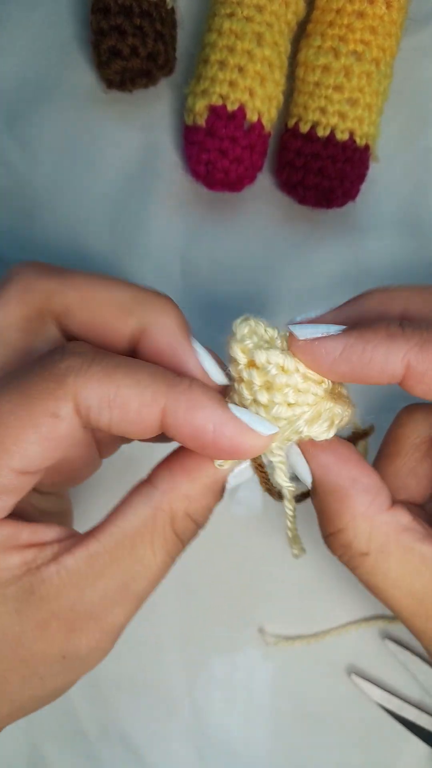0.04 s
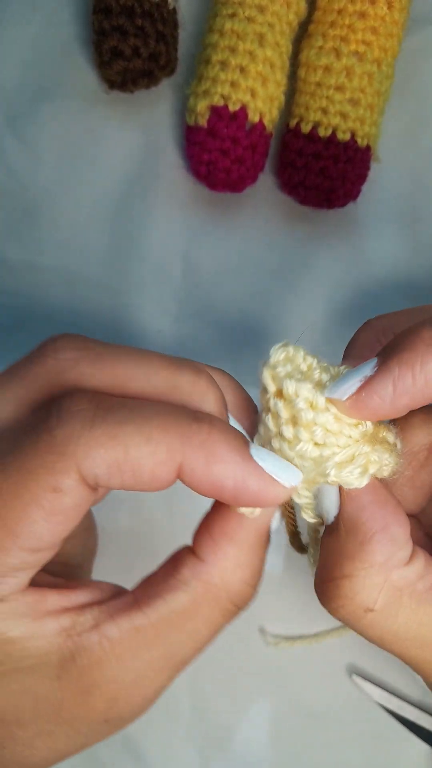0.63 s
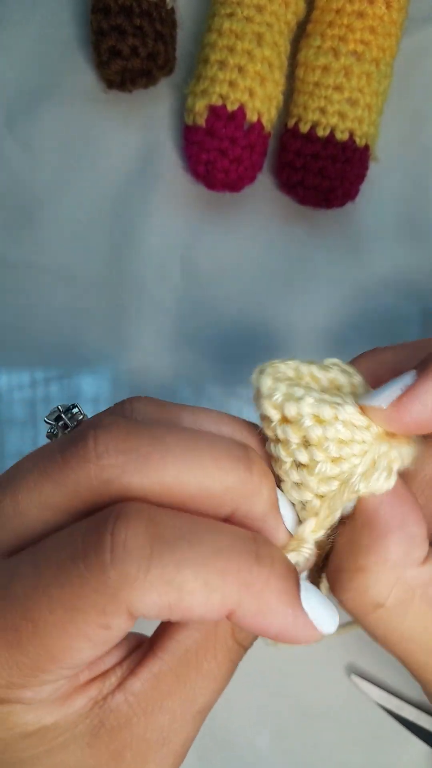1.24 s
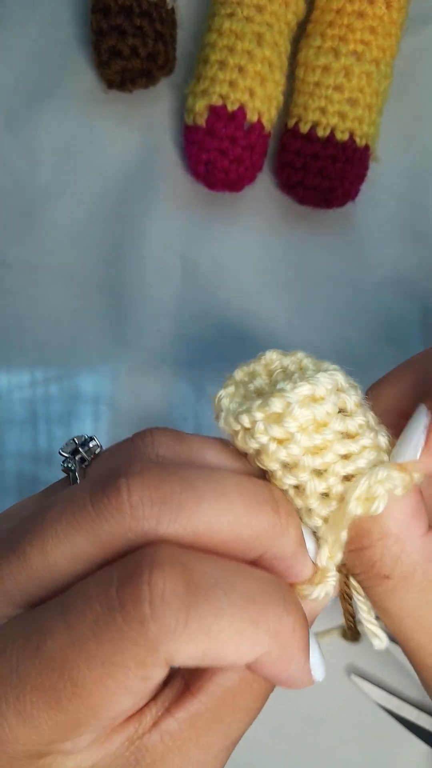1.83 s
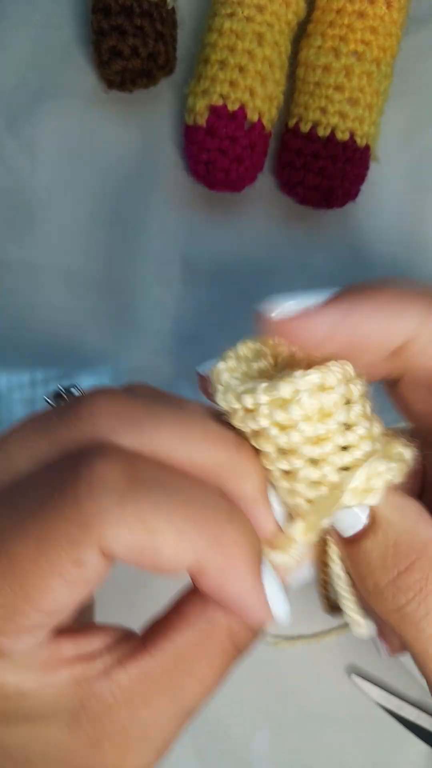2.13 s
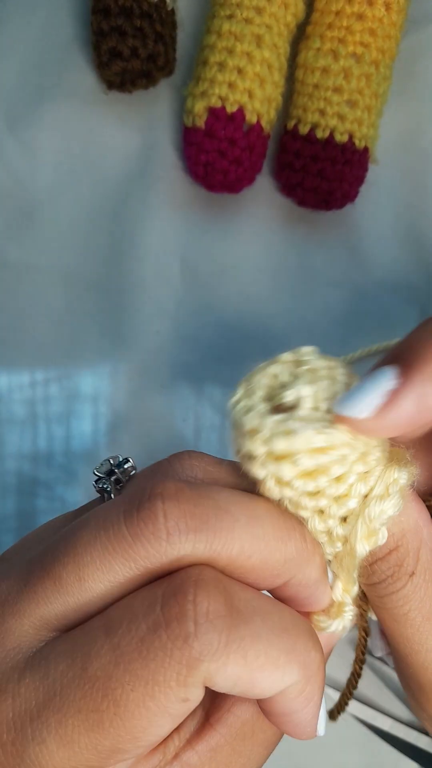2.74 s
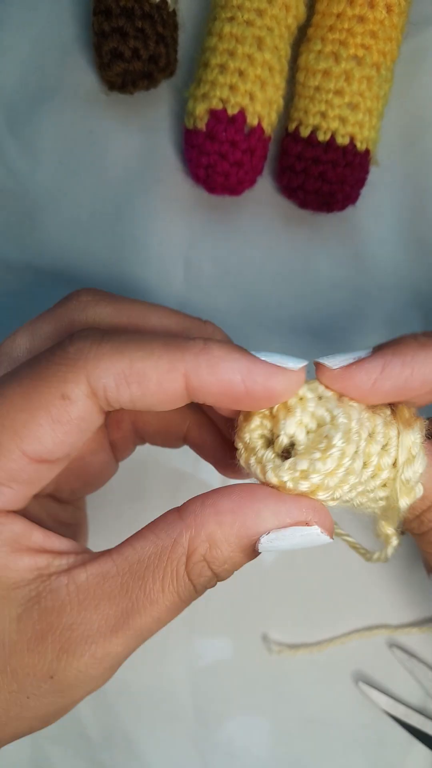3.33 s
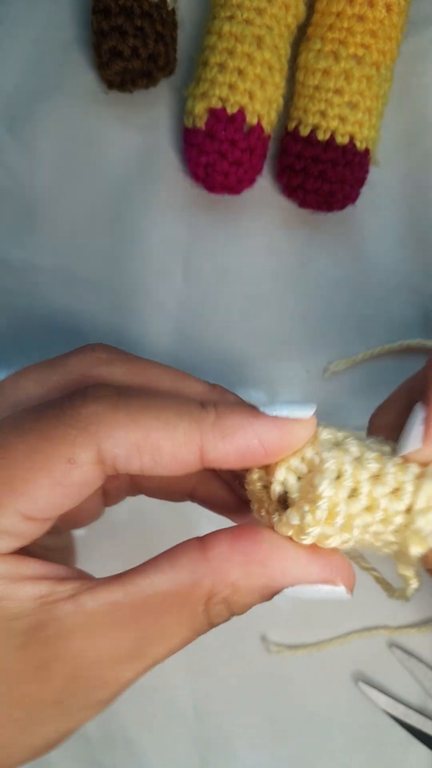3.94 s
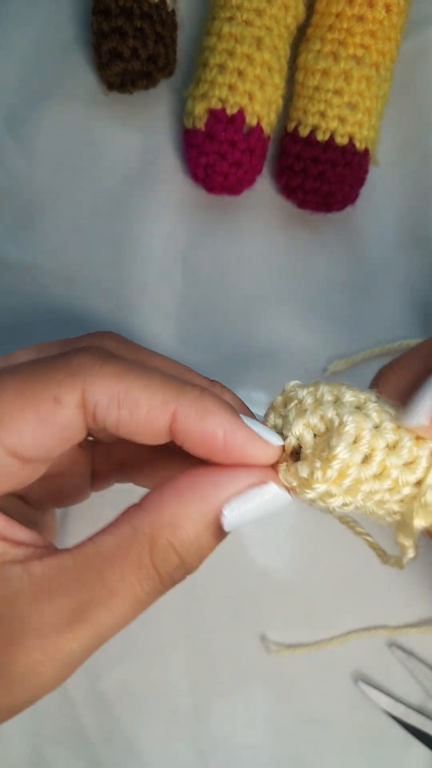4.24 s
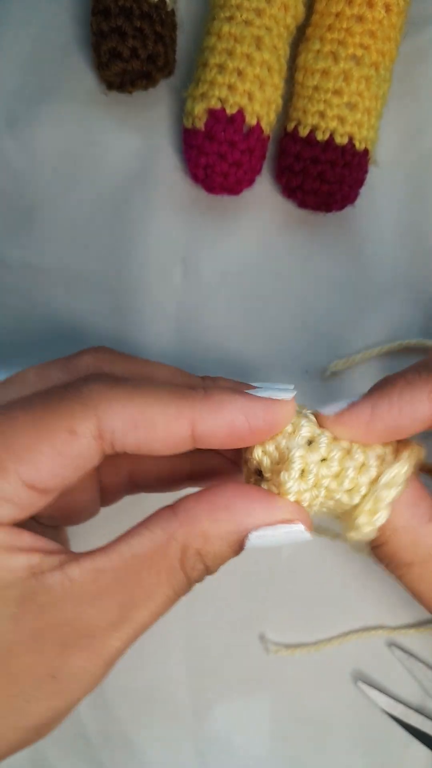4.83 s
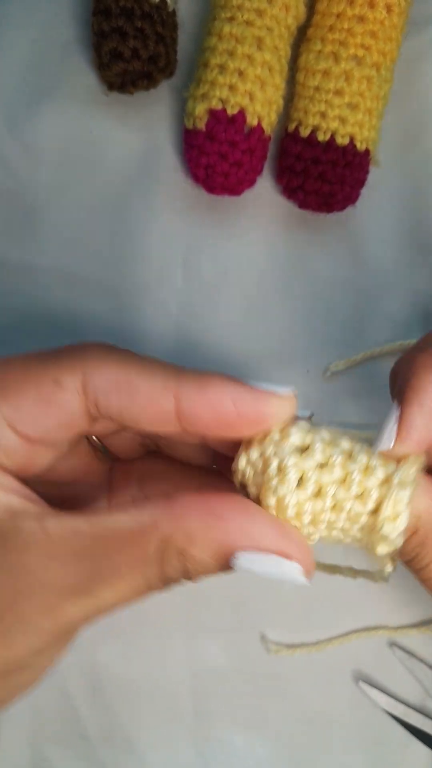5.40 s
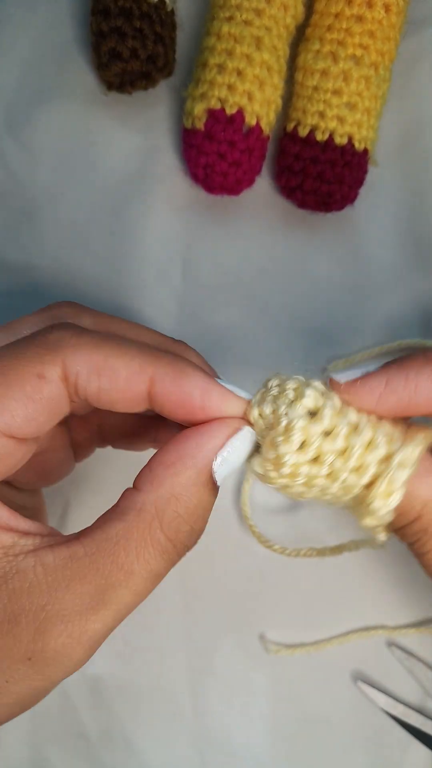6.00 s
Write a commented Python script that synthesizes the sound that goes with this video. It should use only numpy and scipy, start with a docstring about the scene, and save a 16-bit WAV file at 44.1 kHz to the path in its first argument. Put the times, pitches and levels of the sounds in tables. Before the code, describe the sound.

A low hum pulses steadily indoors, with a deep rumble and a little hiss beneath it. Near the microphone, slightly to the left, fingers rub and turn crocheted yarn in short, quiet strokes. Long nails tick and scuff on the stitches, the hands bump with dull thuds, and a few tiny squeaks slip out, mostly in the second half. A dog gives a few faint, hoarse barks in the distance.

```python
"""Yarn rustles close by as long-nailed fingers knead and turn a small crocheted piece in a small room. Behind
it, two motors hum a little out of step and beat slowly against each other, over a low rumble and a faint hiss.
Nails tick as they snap off stitches, the hands bump softly, and a dog barks a few times far away. Shifting skin
rasps, dragged nails scuff, and a few faint squeaks come and go."""
import sys
import numpy as np
from scipy import signal
from scipy.fft import rfft, irfft, next_fast_len
from scipy.io import wavfile

SR = 44100
rng = np.random.default_rng(int(sys.argv[2]) if len(sys.argv) > 2 else 0)


def int16_out(signal):
    """Quantize to a 16-bit WAV file."""
    q = np.round(np.clip(np.atleast_2d(signal).T, -1, 1) * 32767)
    wavfile.write(sys.argv[1], SR, q.astype(np.int16))


N = 271684
TIME = np.arange(N) / SR

# fingers sliding over the yarn: (peak time [s], length [s], relative level [dB])
YARN_STROKES = [(0.015, 0.12, -72.5), (.335, 0.027, -78), (0.466, .07, -77), (0.831, 0.032, -72),
                (1.2, 0.033, -71), (1.256, 0.042, -66), (2.109, .095, -65.5), (2.515, 0.13, -66),
                (2.663, .04, -71.5), (2.783, 0.033, -66), (3, 0.099, -66), (3.773, 0.038, -73.5),
                (3.891, 0.066, -67), (4.365, .13, -72), (4.953, 0.058, -72), (5.185, .1, -78),
                (5.495, 0.1, -79.5), (5.818, 0.072, -75)]
# light brushing between strokes: (time [s], relative level [dB])
LIGHT_BRUSHING = [(0, -92), (.55, -86.5), (.72, -72), (.88, -81.5), (1.1, -75.5), (1.7, -84), (2.3, -89),
                  (3.2, -75), (3.65, -85), (4.05, -77.5), (4.7, -85.5), (6.16, -87.5)]
# tone of slipping fibres: (frequency [Hz], relative level [dB])
YARN_SPECTRUM = [(1500, 2), (4000, -5), (5600, -4), (8300, 0.5), (10500, -5.5), (13000, -8.5), (16000, -8)]
# the room's low rumble: (frequency [Hz], relative level [dB])
RUMBLE_SPECTRUM = [(27, -29.5), (34, -23.5), (39, 2.5), (50, 0), (64, 2), (100, -3), (150, -6.5),
                   (200, -14), (300, -19.5), (450, -29), (650, -37.5), (1200, -45), (2500, -56)]
# how the rumble leans to one side: (frequency [Hz], relative lean to the left [dB])
RUMBLE_LEAN = [(40, -0.5), (130, 3), (270, -2.5), (600, 1)]
# the room's faint hiss: (frequency [Hz], relative level [dB])
HISS_SPECTRUM = [(500, -3), (1500, -0.5), (3000, -1.5), (4800, -4.5), (6200, -3), (8300, 5), (10500, 1),
                 (15500, 0.5)]
# how alike the room's noise is left and right: (frequency [Hz], likeness [0 to 1])
STEREO_LIKENESS = [(40, 0.98), (150, 0.94), (300, 0.58), (600, 0.11), (1500, 0), (12000, 0.037)]
# single nail ticks: (time [s], relative level [dB], rough pitch [Hz])
NAIL_TICKS = [(0.4511, -53.5, 5800), (0.706, -61, 6900), (0.7781, -56, 2250), (1.2567, -61, 2300),
              (1.7927, -60.5, 11000), (1.8047, -60, 4000), (1.833, -50, 7000), (1.9259, -62, 2600),
              (1.9652, -62.5, 2500), (2.1607, -66.5, 4200), (2.5166, -54, 11500), (2.685, -60.5, 9500),
              (2.8363, -72, 1300), (3.8114, -64.5, 6450), (3.8636, -55, 6900), (4.376, -62.5, 5200),
              (4.7276, -68.5, 9500), (6.0463, -67.5, 5000)]
# the knock, snap and sparkle of a tick: (low edge [Hz], high edge [Hz])
NAIL_BANDS = [(820, 2960), (2300, 4200), (5300, 13600)]
# hands bumping together: (time [s], relative level [dB], pitch [Hz])
HAND_BUMPS = [(0.458, -45, 104), (1.531, -37.5, 107), (1.836, -39, 146), (2.469, -50, 192),
              (3.000, -36, 83.4), (3.367, -44, 69), (3.864, -48.5, 168), (5.16, -48, 162), (5.929, -36, 99)]
# far barks: (time [s], length [s], relative level [dB], brightness [dB])
DOG_BARKS = [(0.664, 0.044, -61.5, 2.5), (3.135, 0.062, -62, 1), (3.372, 0.045, -60.5, -18),
             (5.395, 0.048, -72.5, -25)]
# the tones in a bark: (multiple of the pitch [number], relative level [dB])
BARK_HARMONICS = [(1, -6), (2, 6.5), (3, -10.5), (4, -20)]
# where the dog's throat rings: (frequency [Hz], width [Hz], relative level [dB])
THROAT_RESONANCES = [(403, 210, 5.5), (703, 107, 4), (1397, 300, 2.5), (1590, 220, -6), (2000, 180, -34),
                     (2830, 1300, -19)]
# skin and hands shifting: (peak time [s], length [s], relative level [dB])
SKIN_SHIFTS = [(0.82, 0.054, -86), (1.991, 0.029, -71), (2.539, 0.083, -66.5), (3.07, 0.13, -78),
               (3.29, 0.3, -82), (4.423, 0.22, -83), (4.965, 0.069, -83.5)]
# dull tone of rubbing skin: (frequency [Hz], relative level [dB])
SKIN_SPECTRUM = [(250, 9), (500, 2.5), (1000, -1), (1600, -5.5), (2800, 2), (4200, -9), (6000, -6),
                 (10000, -41)]
# nails dragged over stitches: (time [s], length [s], relative level [dB])
NAIL_DRAGS = [(1.521, 0.024, -58.5), (1.539, 0.0096, -56), (1.547, 0.026, -64.5), (3.903, 0.01, -66),
              (3.924, 0.0087, -68), (4.486, 0.022, -65), (5.145, 0.035, -61)]
# bright tone of a dragged nail: (frequency [Hz], relative level [dB])
SCUFF_SPECTRUM = [(500, -4.5), (1200, -14.5), (2500, -1.5), (5000, -3.5), (8300, 6), (12000, -1.5),
                  (16000, 1.5)]
# thin squeaks: (time [s], length [s], pitch [Hz], width [Hz], relative level [dB])
THIN_SQUEAKS = [(2.232, 0.024, 3750, 500, -77), (4.443, .11, 3650, 220, -75),
                (4.508, 0.0856, 3570, 198, -78), (4.585, 0.015, 9020, 1790, -55.5),
                (4.59, .04, 8450, 910, -72), (5.707, .06, 2520, 300, -80.5)]

MOTOR_HZ, OTHER_MOTOR_HZ = 117.802, 119.947
IN_STEP_S = .14   # a moment when both hums push together


def from_db(db):
    """Turn decibels into a number to multiply a sound by."""
    return 10 ** (np.asarray(db) / 20)


def rms_one(x):
    """Scale a sound to an average strength (rms) of 1."""
    return x / np.sqrt(np.mean(x ** 2) + 1e-20)


def at_hz(points, hz):
    """Read between the rows of a table, with frequency spaced in octaves."""
    freqs, values = np.transpose(points)
    return np.interp(np.log(np.maximum(hz, 1)), np.log(freqs), values)


def pan(left_db):
    """Left and right gains that make the left side left_db louder."""
    return from_db(np.array([[left_db], [-left_db]]) / 2)


def add(out, s, sound):
    """Mix a short sound in at time s."""
    start = round(s * SR)
    out[..., start:start + sound.shape[-1]] += sound[..., :N - start]


def keep_band(x, kind, hz, order):
    """Keep the lows, the highs or a band; a higher order cuts more steeply."""
    return signal.sosfilt(signal.butter(order, hz, kind, fs=SR, output="sos"), x)


def colour(x, spectrum):
    """Shape the lows and highs of a steady sound; its rms ends up at 1."""
    size = next_fast_len(N)
    gain = from_db(at_hz(spectrum, np.fft.rfftfreq(size, 1 / SR)))
    return rms_one(irfft(rfft(x, size) * gain, size)[..., :N])


def friction(spectrum, per_s, spread_db, stereo_width):
    """Countless tiny slips of uneven size, each a bit different left and right."""
    slipping = rng.random(N) < per_s / SR
    sizes = from_db(spread_db * np.minimum(rng.exponential(1, N), 4))
    pushes = rng.standard_normal(N) + stereo_width * rng.standard_normal((2, N))
    return colour(slipping * sizes * pushes, spectrum)


def stroke(s, length_s, rise_share=.52, squareness=2.42):
    """Speed of a sliding finger: it builds up, peaks at time s and eases off."""
    width_s = length_s * np.where(TIME < s, rise_share, 1 - rise_share)
    return np.exp(-np.minimum(np.abs((TIME - s) / width_s) ** squareness / 2, 30))


def flutter(per_s, depth_db):
    """A gain that wanders at random, about per_s times a second."""
    steps = rng.standard_normal(4000)
    return from_db(depth_db * np.interp(TIME * per_s, np.arange(len(steps)), steps))


def yarn_rustle(edge_hz=5070, light_db=-78, db_per_octave=21.5):
    """Fingers sliding on yarn hiss; a firmer stroke reaches lower in pitch."""
    slips = friction(YARN_SPECTRUM, per_s=3500, spread_db=2.2, stereo_width=.8)
    slips *= flutter(per_s=63, depth_db=3)   # uneven from stitch to stitch
    brush = from_db(np.interp(TIME, *np.transpose(LIGHT_BRUSHING))) * flutter(per_s=12, depth_db=.5)
    out = brush * keep_band(slips, "high", edge_hz, order=4)
    for s, length_s, db in YARN_STROKES:
        span = slice(max(int((s - 2 * length_s) * SR), 0), int((s + 2 * length_s) * SR))
        low_hz = edge_hz * 2 ** ((light_db - db) / db_per_octave)
        hiss = keep_band(slips[:, span], "high", low_hz, order=4)
        out[:, span] += from_db(db) * stroke(s, length_s)[span] * hiss
    return out


def reverb(x, fade_s, top_hz):
    """Many echoes off the walls, different on each side, falling 60 dB in fade_s."""
    t = TIME[:SR // 2]
    tail = rng.standard_normal((2, len(t))) * from_db(-60 * t / fade_s) * (1 - np.exp(-t / .0011))
    tail = keep_band(tail, "low", top_hz, order=1)
    return signal.fftconvolve(x, tail / np.sqrt(np.sum(tail ** 2) / 2), axes=-1)[:, :N]


def hum(motor_db, other_motor_db, overtone_db):
    """One motor turns a little slower than the other, so together they throb about twice a second."""
    turn = 2 * np.pi * (TIME - IN_STEP_S)
    motor = from_db(motor_db) * np.cos(MOTOR_HZ * turn)
    other_motor = from_db(other_motor_db) * np.cos(OTHER_MOTOR_HZ * turn)
    return motor + other_motor + from_db(overtone_db) * np.cos(2 * OTHER_MOTOR_HZ * turn)


def noise_all_around(spectrum):
    """Noise from every side: left and right are alike in the bass, unrelated in the treble."""
    size = next_fast_len(N)
    alike = at_hz(STEREO_LIKENESS, np.fft.rfftfreq(size, 1 / SR))
    shared, opposite = rfft(rng.standard_normal((2, size)))
    both = np.sqrt(1 + alike) * shared + np.sqrt(1 - alike) * opposite * [[1], [-1]]
    return colour(irfft(both, size), spectrum)


def room_air(rumble_db, hiss_db, rumble_throb, hiss_throb):
    """Low rumble and faint hiss that swell and sink with the throb of the hum."""
    beat = np.log(1.25 + np.cos(2 * np.pi * (OTHER_MOTOR_HZ - MOTOR_HZ) * (TIME - IN_STEP_S)))
    rumble = noise_all_around(RUMBLE_SPECTRUM)
    for channel, side in enumerate((1, -1)):
        rumble[channel] = colour(rumble[channel], [(hz, side * db / 2) for hz, db in RUMBLE_LEAN])
    deep = signal.sosfiltfilt(signal.butter(2, 90, fs=SR, output="sos"), rumble)
    throb_db = rumble_throb * beat
    rumble = deep * from_db(throb_db / 2) + (rumble - deep) * from_db(throb_db)
    hiss = from_db(hiss_db + hiss_throb * beat) * noise_all_around(HISS_SPECTRUM)
    return from_db(rumble_db) * rumble * pan(1.6) + hiss * pan(1.3)


def slipping_strand(start_s=.9193, first_gap_s=.0145, slowing=1.73, first_db=-68.5, hz=8100):
    """A strand tightens as it slips under a nail: lists five ticks, ever slower and harder."""
    gaps = first_gap_s * slowing ** np.arange(4)
    times = start_s + np.append(0, np.cumsum(gaps))
    return [(s, first_db + k, hz) for k, s in enumerate(times)]


def tick_band_levels(db, hz, hard_db=-52.5):
    """A tick is strongest near its pitch, and spreads wider the harder it is."""
    centres_hz = np.sqrt(np.prod(NAIL_BANDS, axis=1))
    db_per_octave = 4 + .57 * (hard_db - db)
    return db - db_per_octave * np.abs(np.log2(centres_hz / hz))


def resonate(x, hz, width_hz):
    """Ring at one pitch; a smaller width rings longer."""
    r = np.exp(-np.pi * width_hz / SR)
    feedback = [1, -2 * r * np.cos(2 * np.pi * hz / SR), r * r]
    return signal.lfilter(np.array([1, 0, -1]) * (1 - r * r) / 2, feedback, x)


def nail_ticks(crackle=.26, decay_s=.0026, bounce_db=-12.5, bounce_s=.0021):
    """A nail snaps off a stitch or another nail: a click, its echo off the hand and a brief crackle."""
    out, t = np.zeros((2, N)), TIME[:SR // 60]
    for s, tick_db, hz in NAIL_TICKS + slipping_strand():
        click = crackle * rng.standard_normal((2, len(t))) * np.exp(-t / decay_s)
        click[:, 0] += 1
        click[:, round(bounce_s * rng.uniform(.6, 1.4) * SR)] += from_db(bounce_db)
        click += from_db(-4) * resonate(click, hz=996, width_hz=57)   # a long nail rings briefly
        for edges_hz, db in zip(NAIL_BANDS, tick_band_levels(tick_db, hz)):
            band = keep_band(click, "band", edges_hz, order=3)
            add(out, s, from_db(db) * band / band[:, :SR // 200].std())
    return out


def hand_bumps(rise_cycles=.45):
    """Flesh on flesh: a low thud that dies within a few vibrations."""
    out, t = np.zeros(N), TIME[:SR // 8]
    for s, db, hz in HAND_BUMPS:
        age = t * hz / rise_cycles
        add(out, s, -from_db(db) * age * np.exp(1 - age) * np.sin(2 * np.pi * hz * t))
    return out


def dog(pitch_hz, tone_db, rasp_db, echo_db):
    """Hoarse barks that ring most an octave above their pitch, blurred by walls on the way."""
    out, t = np.zeros((2, N)), TIME[:SR // 3]
    for s, length_s, db, bright_db in DOG_BARKS:
        # the rasp outlasts the tone
        tone_shape = (1 - np.exp(-t / .009)) * np.exp(-np.maximum(t - .7 * length_s, 0) / .02)
        rasp_shape = (1 - np.exp(-t / .0083)) * np.exp(-np.maximum(t - length_s / 2, 0) / .045)
        noise = rng.standard_normal((3, len(t)))
        breath, jitter = noise[:2], noise[2]
        phase = 2 * np.pi * np.cumsum(pitch_hz * (1 + .24 * jitter)) / SR
        tone = sum(from_db(level) * np.sin(k * phase) for k, level in BARK_HARMONICS)
        throat = sum(from_db(level) * resonate(breath, hz, width)
                     for hz, width, level in THROAT_RESONANCES)
        chest = keep_band(throat, "low", 700, order=1)
        rasp = chest + from_db(bright_db) * (throat - chest)   # a duller bark keeps its lows
        rasp = keep_band(rasp, "low", 3100, order=6) / throat.std()
        add(out, s, from_db(db + tone_db) * tone_shape * tone + from_db(db + rasp_db) * rasp_shape * rasp)
    return out + from_db(echo_db) * reverb(out, fade_s=.092, top_hz=6300)


def skin_rasp(gain_db):
    """Skin rubs with a soft, dull rasp as the hands shift."""
    press = sum(from_db(db + gain_db) * stroke(s, length_s) for s, length_s, db in SKIN_SHIFTS)
    return press * friction(SKIN_SPECTRUM, per_s=3000, spread_db=6, stereo_width=.58)


def swell(length_s):
    """A rounded rise and fall."""
    return np.sin(np.linspace(0, np.pi, int(length_s * SR))).clip(0) ** .5


def nail_scuffs(gain_db):
    """A nail dragged over stitches gives a short, bright scuff."""
    drag = np.zeros(N)
    for s, length_s, db in NAIL_DRAGS:
        add(drag, s, from_db(db + gain_db) * swell(length_s))
    return drag * friction(SCUFF_SPECTRUM, per_s=12000, spread_db=2.5, stereo_width=1)


def squeaks(droop=.018):
    """Faint, thin, wavering tones that sag in pitch as they go."""
    out = np.zeros(N)
    for s, length_s, hz, width_hz, db in THIN_SQUEAKS:
        shape = swell(length_s)
        pitch = hz * (1 - droop * np.linspace(-.5, .5, len(shape)))
        phase = 2 * np.pi * np.cumsum(pitch) / SR
        noise = rng.standard_normal((2, SR // 3))
        waver = keep_band(noise, "low", width_hz / 3, order=2)[:, -len(shape):]
        add(out, s, from_db(db) * shape * rms_one(waver[0] * np.cos(phase) + waver[1] * np.sin(phase)))
    return out


def delay_right(x, samples):
    """The right side of the microphone hears the sound just after the left."""
    return np.array([x[0], np.pad(x[1], (samples, 0))[:N]])


def scene():
    """Hands close by and a little to the left, over the room's hum and air and a far dog."""
    rubs = yarn_rustle() + skin_rasp(gain_db=3.5) + nail_scuffs(gain_db=4.5) + squeaks()
    hands = rubs * pan(3.3) + nail_ticks() * pan(4.7)
    hands += from_db(-10.5) * reverb(hands, fade_s=.26, top_hz=6600)
    drone = hum(motor_db=-50, other_motor_db=-53.5, overtone_db=-74) * pan(3.1)
    air = room_air(rumble_db=-55, hiss_db=-79.5, rumble_throb=2, hiss_throb=.3)
    thuds = hand_bumps() * pan(1.5)
    barks = dog(pitch_hz=388, tone_db=.3, rasp_db=2.5, echo_db=-11) * pan(2.7)
    return delay_right(hands + drone + air + thuds + barks, samples=7)


def record(dry, cutoff_hz=15900):
    """The very highest treble is cut off steeply."""
    return signal.sosfilt(signal.ellip(10, .1, 70, cutoff_hz, fs=SR, output="sos"), dry)


dry = scene()
out = record(dry)
int16_out(out)
```